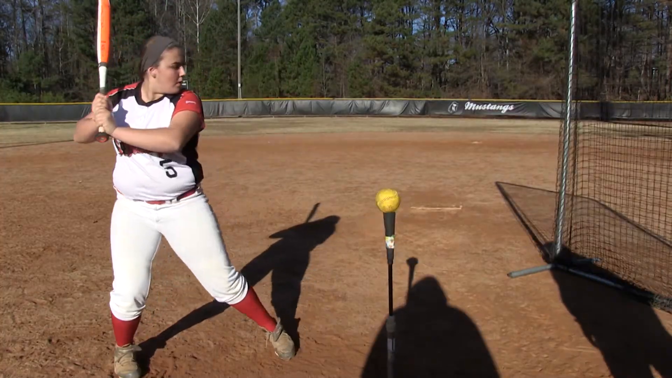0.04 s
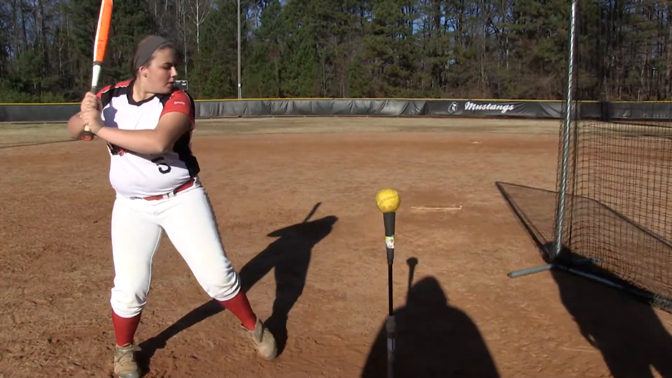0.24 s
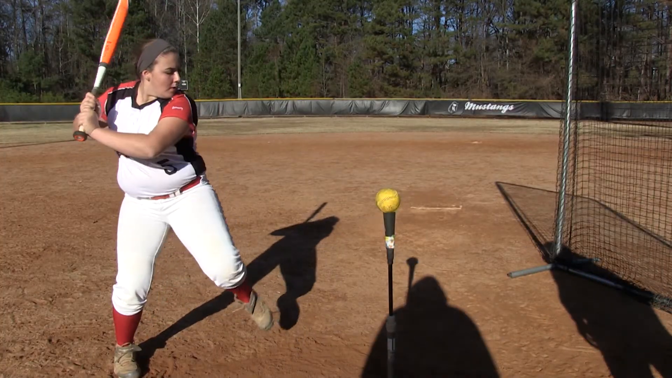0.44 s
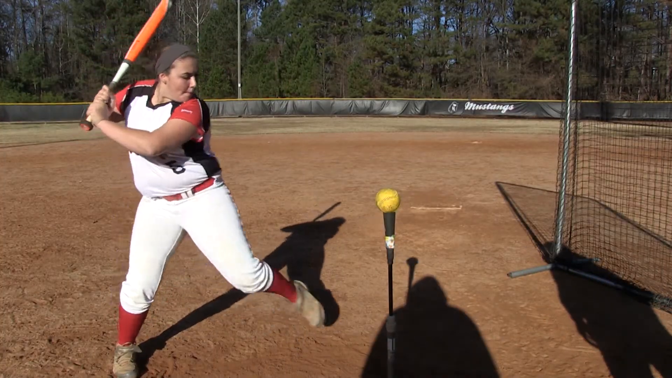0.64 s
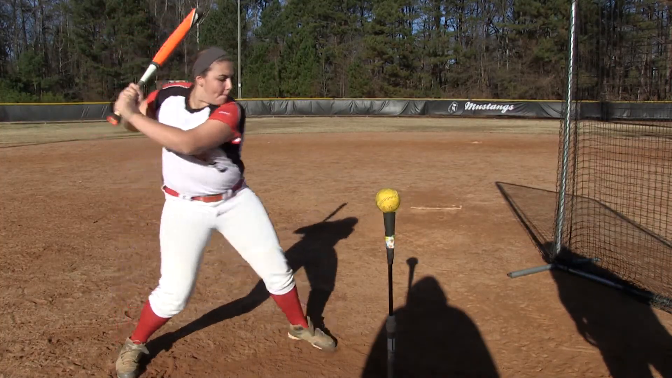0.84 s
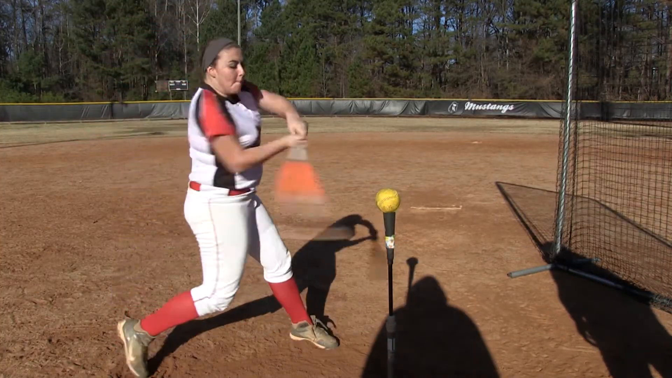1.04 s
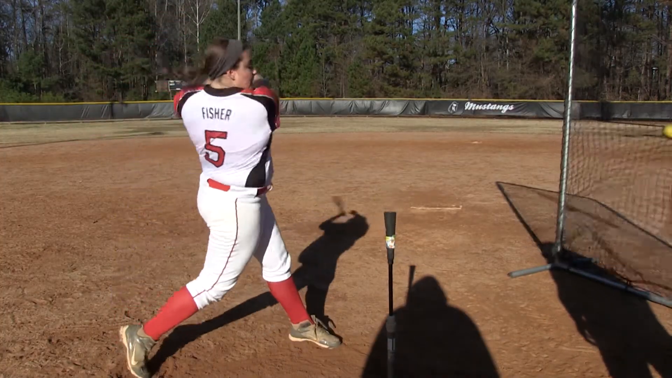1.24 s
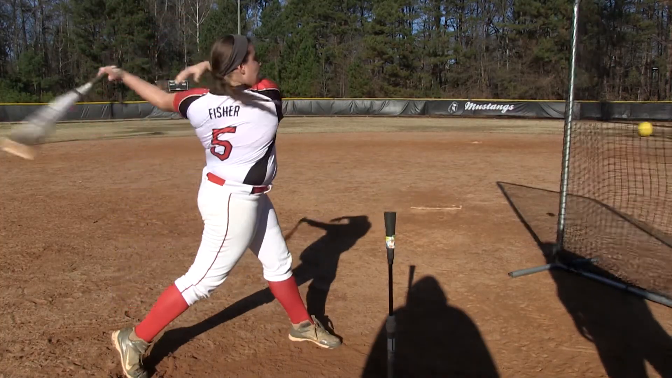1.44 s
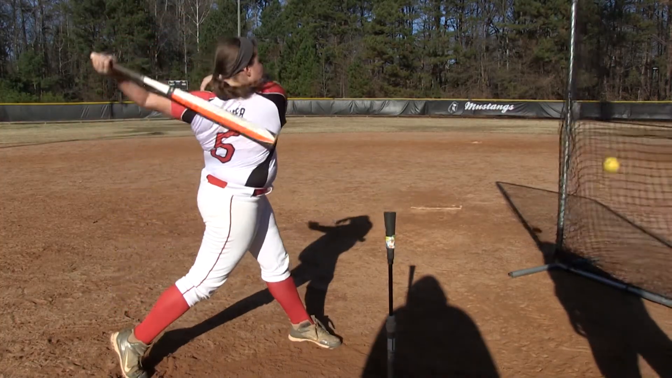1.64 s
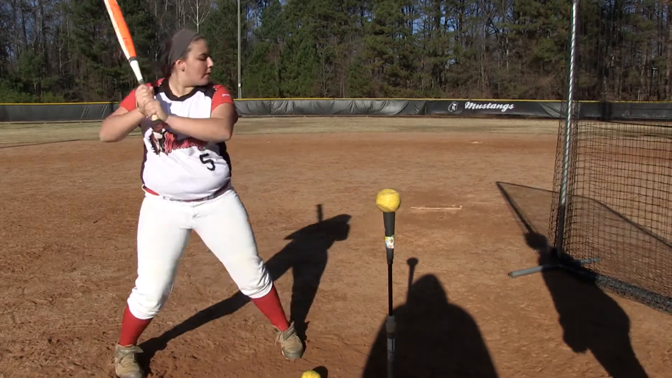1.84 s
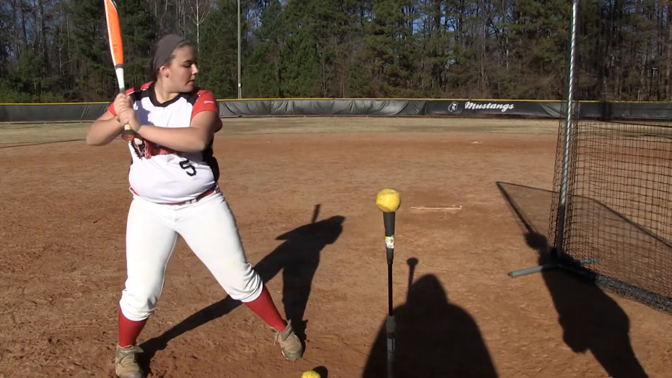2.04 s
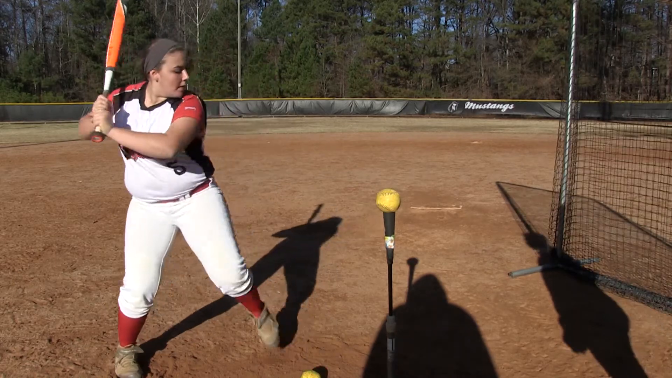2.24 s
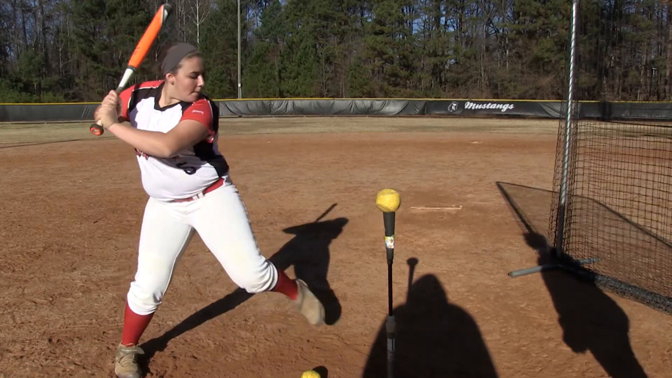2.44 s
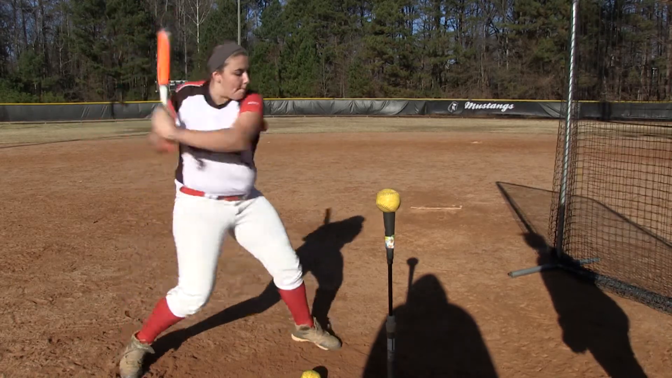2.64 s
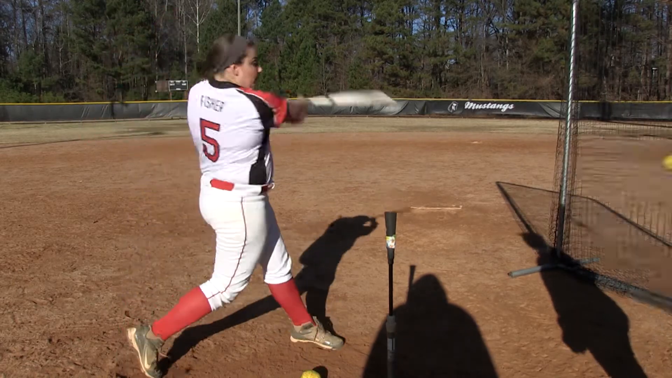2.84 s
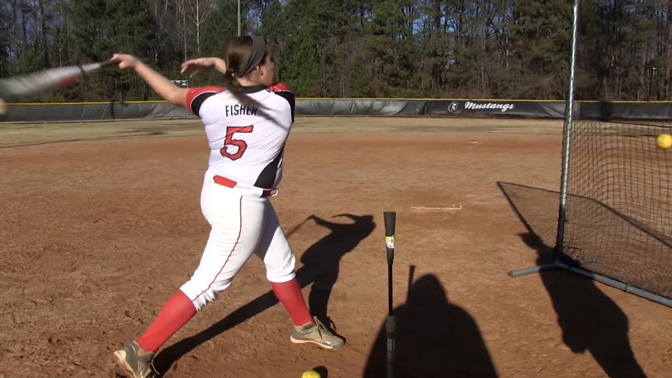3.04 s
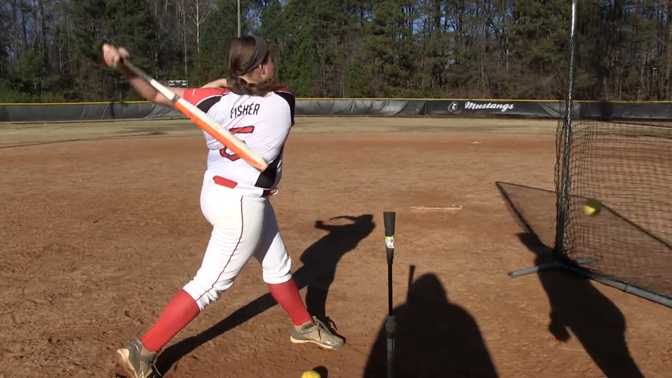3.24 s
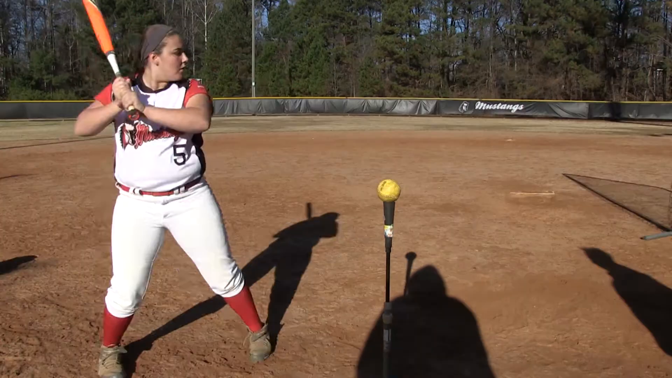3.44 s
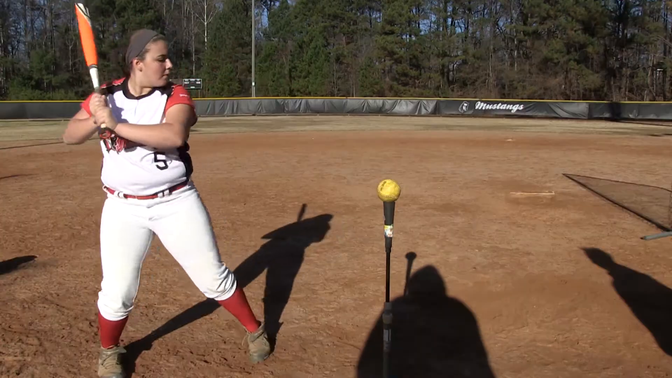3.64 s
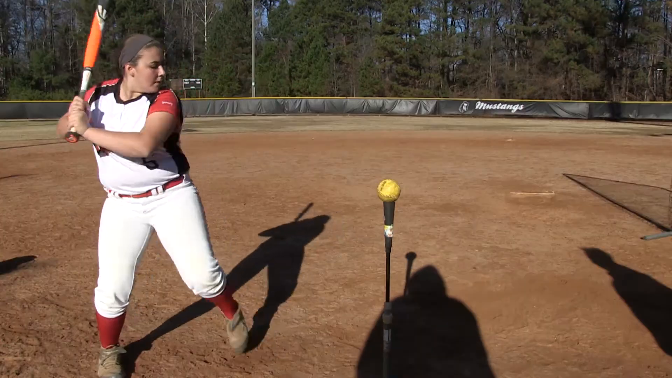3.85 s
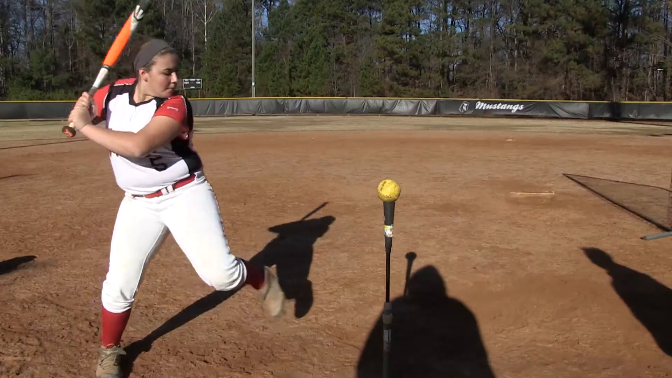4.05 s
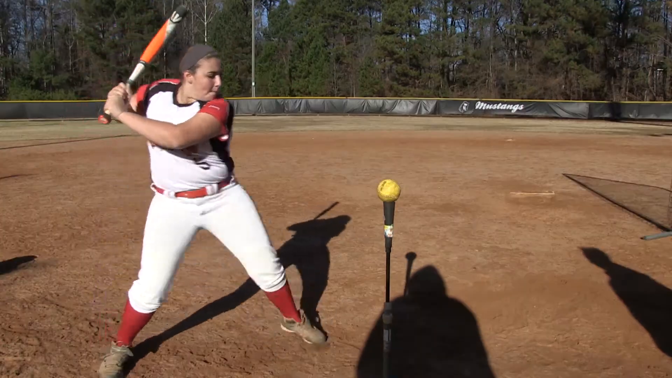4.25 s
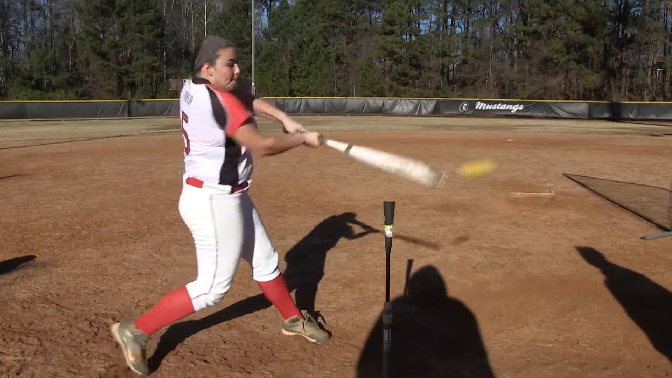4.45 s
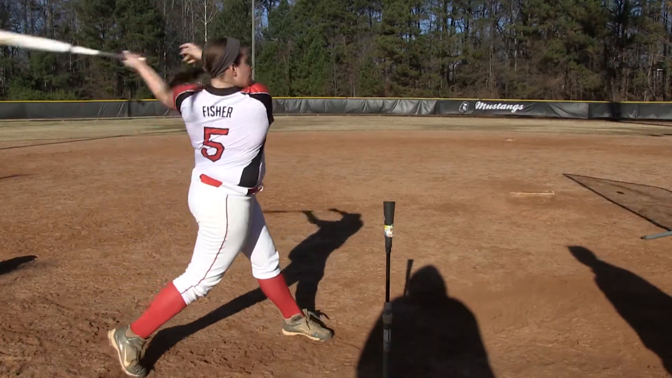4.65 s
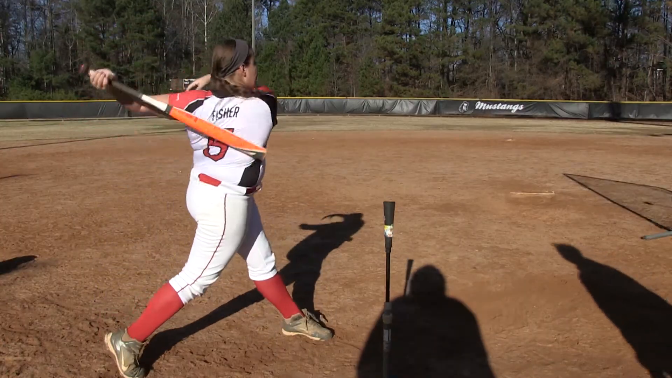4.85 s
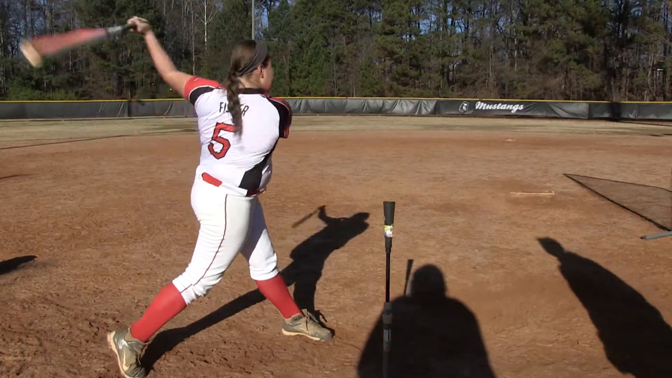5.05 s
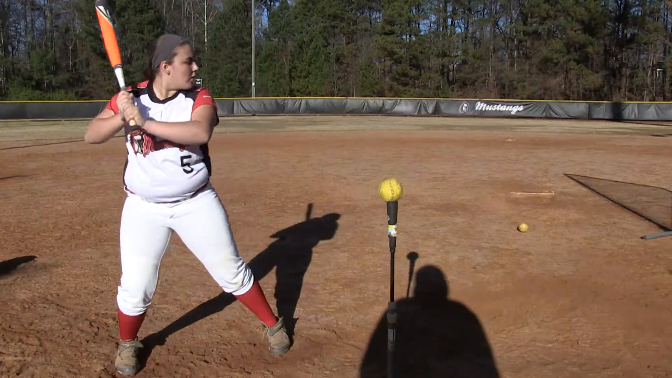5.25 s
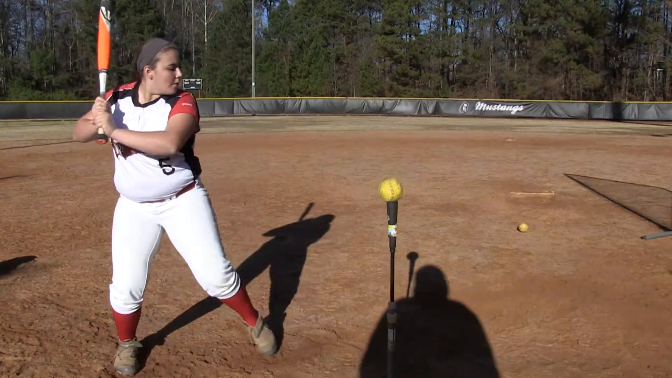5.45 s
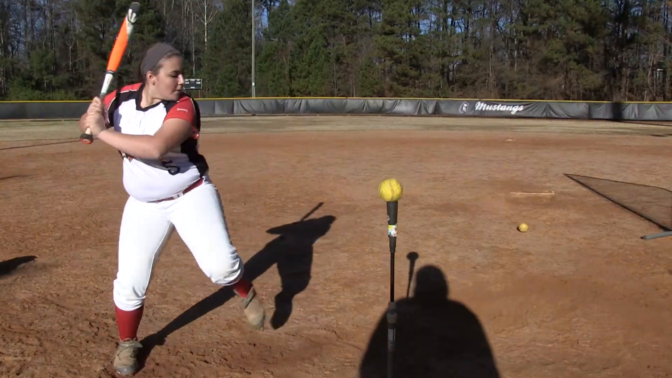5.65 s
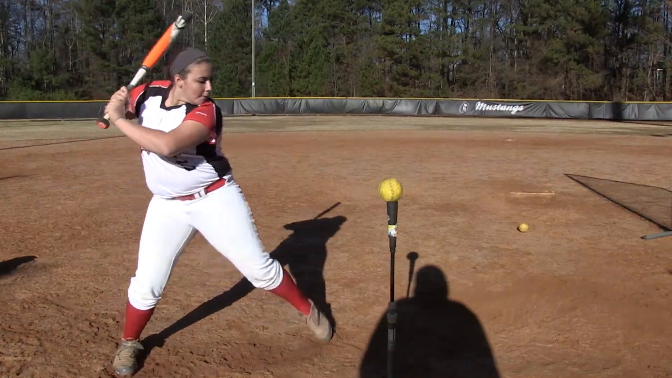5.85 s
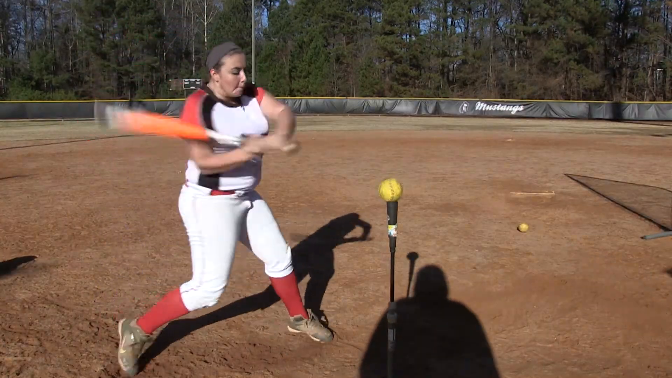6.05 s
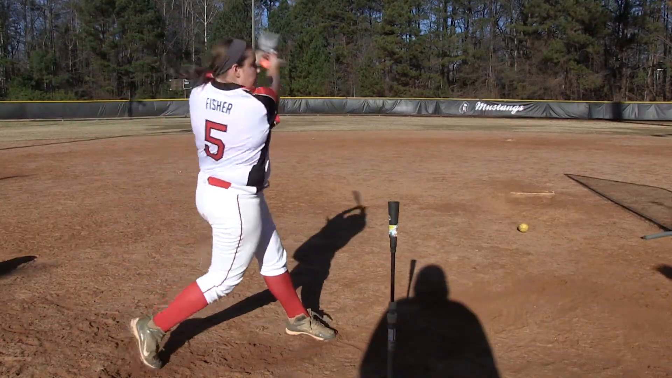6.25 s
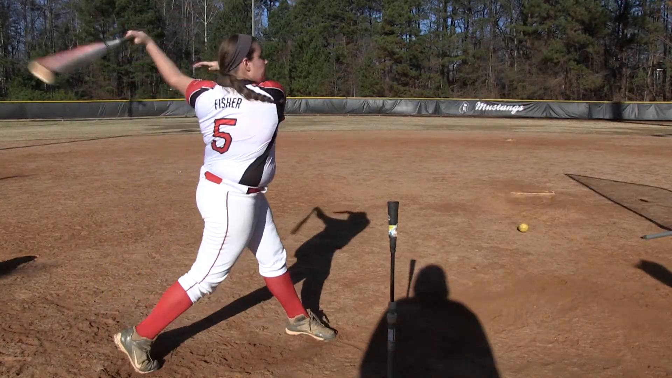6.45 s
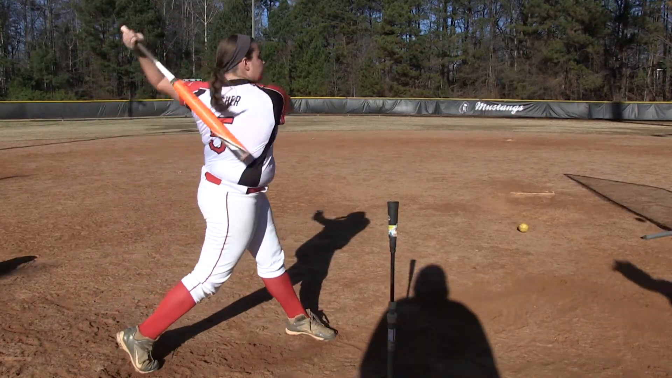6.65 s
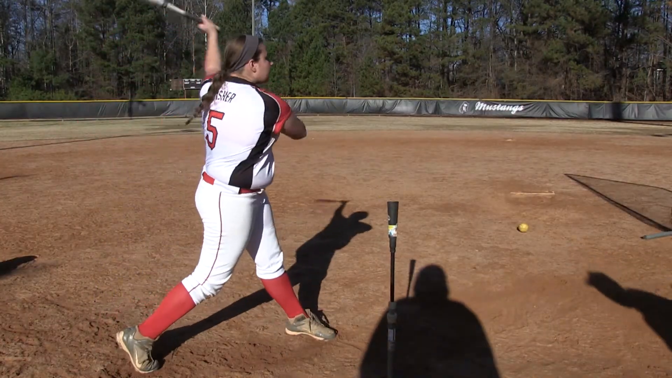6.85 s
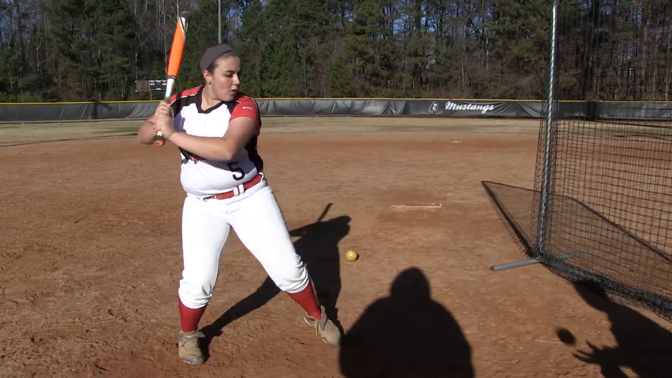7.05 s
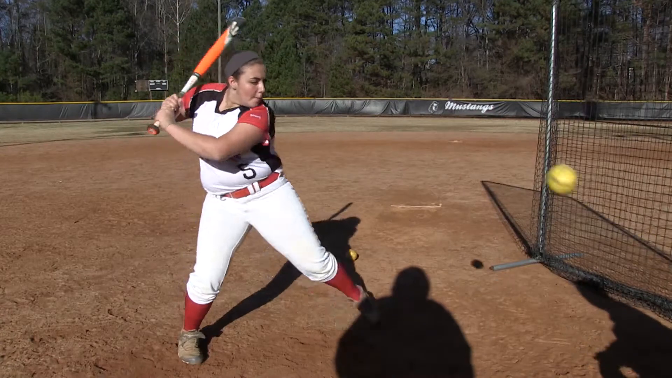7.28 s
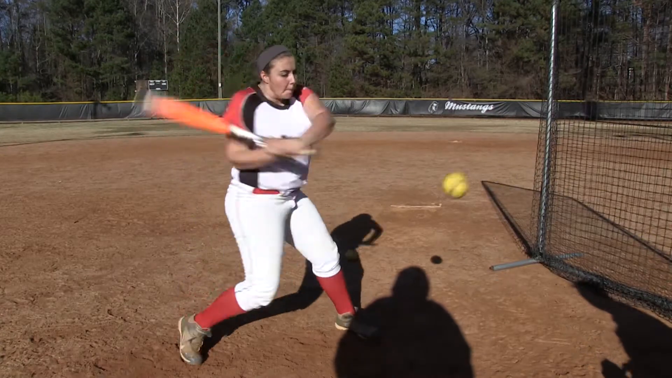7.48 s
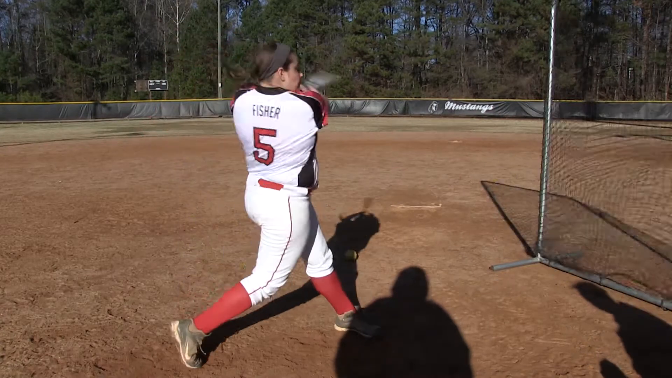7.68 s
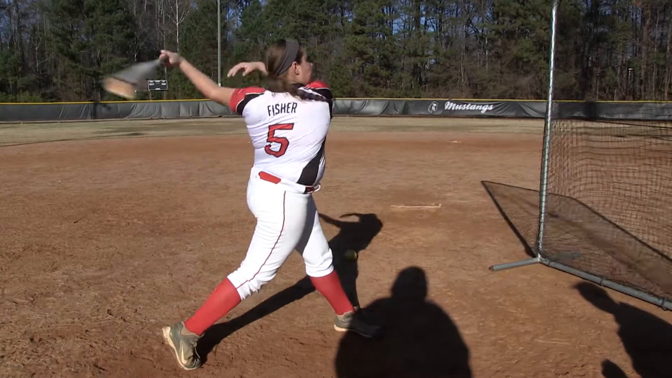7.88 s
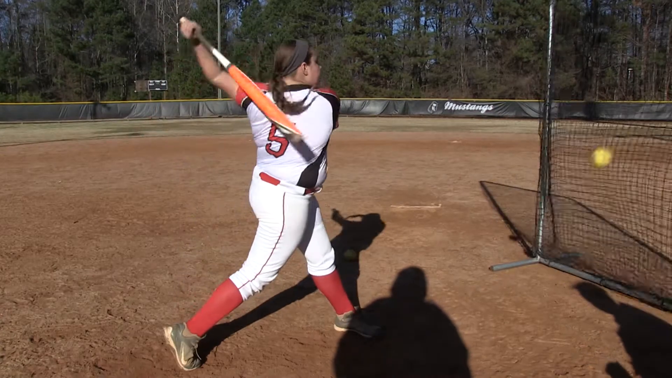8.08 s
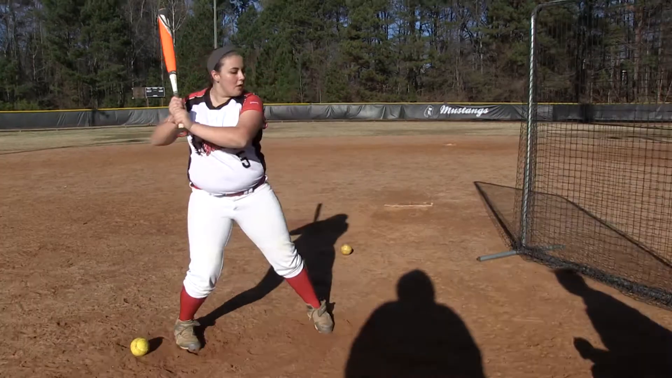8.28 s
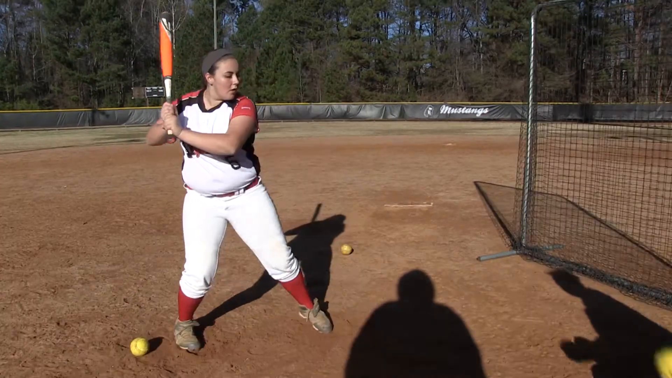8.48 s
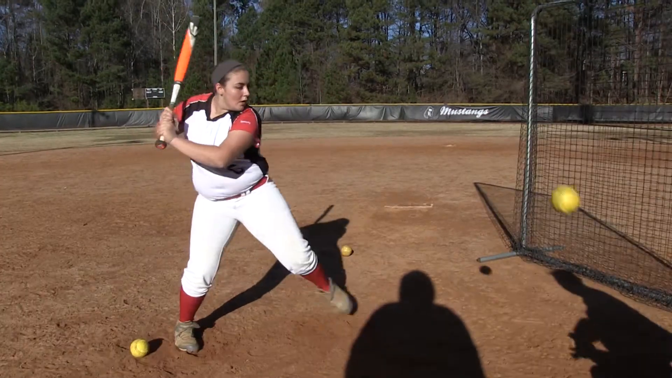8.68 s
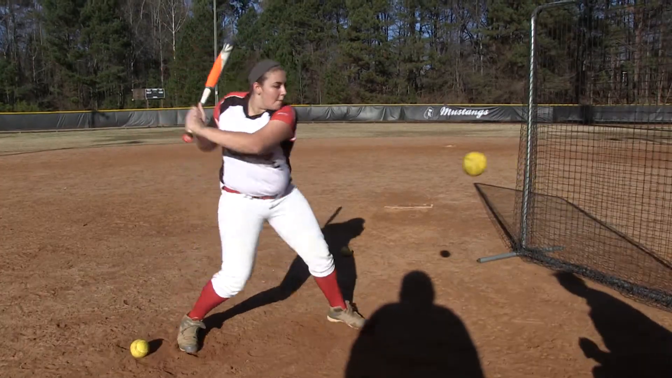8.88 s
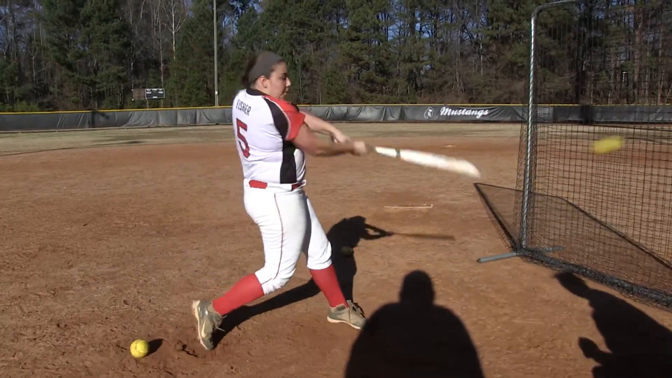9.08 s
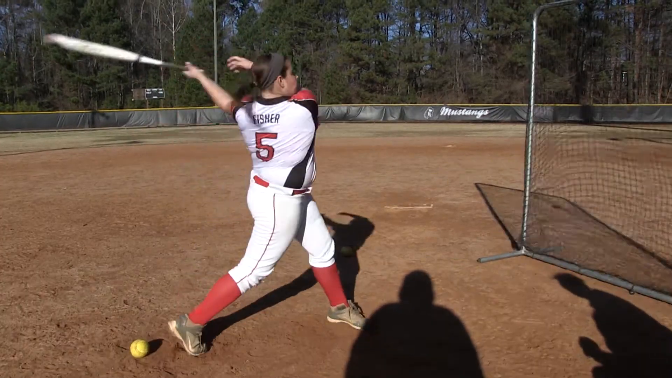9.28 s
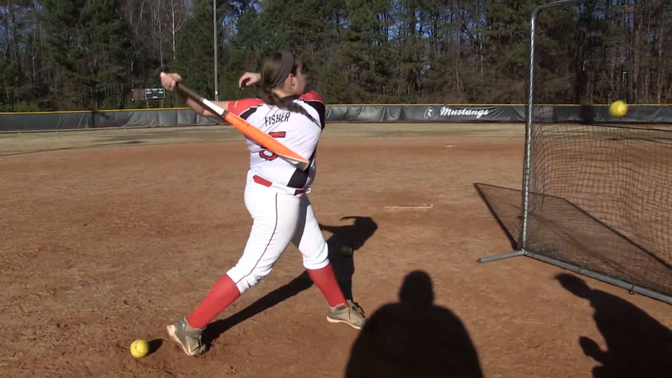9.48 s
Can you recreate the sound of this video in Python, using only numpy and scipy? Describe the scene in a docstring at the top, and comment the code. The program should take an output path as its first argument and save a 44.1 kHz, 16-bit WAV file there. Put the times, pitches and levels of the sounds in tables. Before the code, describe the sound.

Six hard metal bat cracks on an open field, each followed at once by a net snapping taut and its steel frame rattling.

```python
"""Batting practice on an open dirt field

A metal bat hits six softballs: modes and noise that overload the nearby microphone.
The net snaps taut in damped bursts; its steel frame rattles and rings; balls drop on the dirt with noisy thuds.
Cleats scuff before the swings. Filtered noise makes one gust on the microphone, the light breeze
and the distant traffic behind the trees; faint arched whistles sound far off."""
import sys
import numpy as np
from scipy import signal
from scipy.fft import rfft, irfft, next_fast_len
from scipy.io import wavfile
from scipy.ndimage import map_coordinates

SR = 44100
rng = np.random.default_rng(int(sys.argv[2]) if len(sys.argv) > 2 else 0)


def log_audio(samples):
    """Write samples as a 16-bit WAV file to the path given in sys.argv[1]."""
    # one column per channel
    frames = np.atleast_2d(samples).T
    # limit to full scale, then quantise
    limited = np.clip(frames, -1, 1)
    pcm = np.round(limited * 32767).astype(np.int16)
    wavfile.write(sys.argv[1], SR, pcm)


N = 419832
T = np.arange(N) / SR

# Bat on ball. Each row: start in seconds, knock level in dB, knock pitch in Hz, then levels in dB
# of the body, the crack and the barrel's low, middle and high rings.
HITS = [(1.1592, 12.5, 816, 8, -5, -6, -7.5, -31), (2.8401, 10.5, 1078, 3.5, 0.5, -18.5, -16, -20.5),
        (4.5040, 11, 1066, 3, -3.5, -18.5, -14, -25), (6.1799, 15, 1090, 2.5, 3, -17.5, -11.5, -8),
        (7.6230, 11, 1046, -1.5, .5, -18, -9.5, -12.5), (9.1163, 10, 823, -8, -2, -11.5, -27, -2.5)]
# Frame and loose bar shaking. Each row: start and stop in seconds, clatter and jingle levels in dB,
# bar pitch in Hz, bar level in dB.
SHAKES = [(1.282, 1.9, -26.5, -21, 2262, -31), (2.926, 3.46, -27.5, -22.5, 3012, -33),
          (4.655, 5.135, -32, -26, 3005, -36), (6.333, 6.935, -30.5, -23, 3017, -37),
          (7.695, 8.33, -20.5, -16.5, 3030, -36.5), (9.191, 9.52, -22, -19.5, 3008, -30.5)]
# Spectrum of the frame's clatter. Each row: frequency in Hz, level in dB.
CLATTER = [(120, 0), (200, 0.5), (581, 1), (683, -5), (775, 6.5), (946, -1), (1110, 8), (1290, -1),
           (2250, 0.5), (2850, -10.5), (3060, -1), (5660, -22.5), (7970, -36), (8720, -41), (15000, -68)]
# Spectrum of grit under cleats. Each row: frequency in Hz, level in dB.
GRIT = [(300, -6), (1000, 8), (2500, -1), (5000, -7), (9000, -12), (12000, -12.5), (16000, -26)]


def undb(db):
    """Decibels to gain."""
    return 10 ** (np.asarray(db) / 20)


def fade(t, t60):
    """Exponential decay, 60 dB in t60 seconds."""
    return np.exp(-np.log(1000) * t / t60)


def clock(length_s):
    """Sample times of a sound of this length, at least 16 samples."""
    return np.arange(max(int(length_s * SR), 16)) / SR


def add(out, start_s, x):
    """Mix x into out from start_s, cut at the end of the scene."""
    i = max(int(start_s * SR), 0)
    out[:, i:i + x.shape[-1]] += x[..., :max(N - i, 0)]


def colour(x, points):
    """Filter x by (Hz, dB) points, interpolated over log frequency; rms 1 over all channels."""
    hz, db = np.transpose(points)
    size = next_fast_len(x.shape[-1])
    f = np.maximum(np.fft.rfftfreq(size, 1 / SR), 1)
    gain = undb(np.interp(np.log(f), np.log(hz), db))
    y = irfft(rfft(x, size) * gain, size)[..., :x.shape[-1]]
    return y / np.sqrt(np.mean(y ** 2))


def noise(t, points, grain_db=0, wide_hz=4000):
    """Stereo noise of tiny impacts with uneven sizes; the channels part above wide_hz."""
    own = np.random.default_rng(rng.integers(2 ** 31))
    x = own.standard_normal((len(t), 2)).T
    # one size per 24 samples
    sizes = np.minimum(own.exponential(size=len(t) // 24 + 1), 5)
    sizes = np.repeat(sizes, 24)[:len(t)]
    mid, side = x * undb(grain_db * sizes)
    side = signal.lfilter(*signal.butter(1, min(wide_hz, SR / 3), "high", fs=SR), side)
    return colour(np.array([mid + side, mid - side]), points)


def walk(t, rate_hz):
    """Smooth random wander, spread near 1."""
    steps = rng.standard_normal(512)
    return map_coordinates(steps, [t * rate_hz], order=2, mode="wrap")


def ring(t, hz, t60):
    """One struck mode, starting from rest position."""
    return np.sin(2 * np.pi * hz * t) * fade(t, t60)


def kick(t, hz, t60):
    """One mode that starts at full swing."""
    return np.cos(2 * np.pi * hz * t) * fade(t, t60)


def shaken(t, hz, t60, chatter_t60):
    """A mode struck repeatedly by a dying chatter, swelling then fading; each channel hears another mix."""
    blows = noise(t, [(20, 0.022), (16000, 0)], wide_hz=1500) * fade(t, chatter_t60)
    pole = fade(1 / SR, t60) * np.exp(2j * np.pi * min(hz, .45 * SR) / SR)
    y = signal.lfilter([1], [1, -pole], blows).imag
    # same energy in each channel as the plain decay
    return y * np.sqrt(np.sum(fade(t, t60) ** 2) / np.sum(y ** 2, axis=1, keepdims=True))


def partials(t, hz, points):
    """Many weak steady modes with chance strengths, parting more between channels as they rise; rms 1."""
    lines = np.zeros((2, SR // 2 + 1), complex)
    phases = np.exp(2j * np.pi * rng.random((3, len(hz))))
    shared, left, right = rng.standard_normal((3, len(hz))) * phases
    lines[:, hz.astype(int)] = shared + hz / 4000 * np.array([left, right])
    return colour(irfft(lines)[:, :len(t)], points)


def taps(t, rate_hz, tap_hz, spread_octaves=1.6, t60=0.11, spread_db=18):
    """Up to 400 random light taps, each ringing its own short resonance; rms 1."""
    out, u = np.zeros(len(t) + SR), clock(.1)
    for when, pitch, size in rng.random((400, 3))[:int(rate_hz * t[-1])]:
        i = int(when * len(t))
        hz = tap_hz * 2 ** (spread_octaves * (2 * pitch - 1))
        out[i:i + len(u)] += undb(-spread_db * size) * ring(u, hz, t60)
    out = out[:len(t)]
    return out / np.sqrt(np.mean(out ** 2) + 1e-18)


def blow(t, points, t60):
    """A short noisy impact with a sharp onset; its energy is set by t60, whatever its grain."""
    burst = noise(t, points, wide_hz=4870) * (fade(t, t60) + fade(t, 0.0025)) * np.minimum(t / 0.00023, 1)
    return burst * np.sqrt(np.sum(fade(t, t60) ** 2) / np.sum(burst ** 2) * 2)


def snap(hz, t60, ring_db=-4):
    """A short burst peaking at hz, with one damped resonance."""
    t = clock(.12)
    peak = [(hz / 8, -22), (hz / 3.9, -7), (hz, 0), (hz * 1.7, -7), (hz * 4, -24), (hz * 12, -42)]
    return blow(t, peak, t60) + undb(ring_db) * ring(t, hz, t60 * 0.59)


def scuff(length_s, uneven_db=2.5):
    """Cleats press on grit unevenly and let go."""
    t = clock(length_s)
    pressure = np.minimum(t / .002, 1) * np.sqrt(1 - t / t[-1]) * undb(uneven_db * walk(t, 45))
    return noise(t, GRIT, grain_db=3.5, wide_hz=2500) * pressure


def field():
    """Distant traffic and trees as wandering noise, with a light breeze rumbling on the ports."""
    # Spectrum of traffic and trees. Each row: frequency in Hz, level in dB.
    far_spectrum = [(20, -20.5), (50, -8.5), (100, 1.5), (200, -7), (380, -10.5), (480, -9.5), (620, -9),
                    (1200, -22.5), (2900, -34.5), (6000, -42), (10000, -48.5), (13000, -59), (16000, -67)]
    # Traffic level. Each row: time in seconds, level in dB.
    traffic = [(0, -51), (1.8, -49), (9.5, -48)]
    # Breeze level. Each row: time in seconds, level in dB.
    breeze_level = [(0, -57.5), (2.4, -64.5), (5.9, -64), (7.1, -53), (8.7, -64.5)]
    traffic_db = np.interp(T, *np.transpose(traffic)) + 0.6 * walk(T, 19.0)
    far = noise(T, far_spectrum, wide_hz=2200) * undb(traffic_db)
    rumble = [(20, -22.5), (70, 0.5), (150, -13.0), (400, -20.5), (2000, -62.0), (8000, -92.5)]
    breeze = colour(rng.standard_normal((2, N)), rumble)
    puffs_db = 1.5 * walk(T, 4)
    return far + breeze * undb(np.interp(T, *np.transpose(breeze_level)) + puffs_db)


def birds():
    """Faint far whistles, likely birds: sines whose level and pitch arch together."""
    # Each row: start in seconds, pitch in Hz, length in seconds, arch as a share of pitch, level in dB.
    whistles = [(2.17, 7800, .07, 0.0088, -72), (2.35, 7700, .09, .025, -79),
                (3.843, 1500, 0.099, 0.15, -62), (4.058, 3600, 0.25, 0.011, -62)]
    out = np.zeros((2, N))
    for start_s, hz, length_s, arch, db in whistles:
        t = clock(length_s)
        swell = np.sin(np.pi * t / length_s)
        pitch_hz = hz * (1 + arch * swell + 0.004 * walk(t, 60))
        add(out, start_s, undb(db) * swell * np.sin(2 * np.pi * np.cumsum(pitch_hz) / SR))
    return out


def wind(flutter_db=-3.5, eddy_half_width_s=0.016):
    """One gust: eddies hit each microphone port on their own; the biggest swell and pass on the right."""
    # Each row: time in seconds, level in dB, left minus right in dB.
    gust = [(3.46, -26, -4), (3.629, -35.5, -5.5), (3.85, -27.5, -6), (4.17, -30, -9.5), (4.31, -26, 3),
            (4.38, -36.5, -5), (5.131, -42, 3)]
    # Spectrum of the buffeting. Each row: frequency in Hz, level in dB.
    buffet = [(12, -45), (20, -20.5), (75, 2), (117, 0), (189, -3.5), (240, -8.5), (274, -9), (338, -15),
              (700, -36.5), (910, -63), (1540, -120)]
    # Big eddies on the right port. Each row: peak time in seconds, extra level in dB.
    big_eddies = [(3.521, 7.5), (3.76, 12), (4.046, 10)]
    s, db, pan_db = np.transpose(gust)
    flutter = undb(flutter_db * np.array([walk(T, 42), walk(T, 21)]))
    eddies = colour(rng.standard_normal((2, N)), buffet) * flutter
    swell_db = sum(extra_db * np.exp(-((T - at) / eddy_half_width_s) ** 2) for at, extra_db in big_eddies)
    ports_db = np.interp(T, s, pan_db) * np.array([[.5], [-.5]]) + swell_db * np.array([[0], [1]])
    blowing = np.clip(np.minimum(T - s[0], s[-1] - T) / 0.0037, 0, 1)
    return eddies * blowing * undb(np.interp(T, s, db) + ports_db)


def dirt(pivot_db=-56, shuffle_s=.09, grind_s=.13):
    """Balls thud on packed dirt; feet shuffle, the front foot lands, back cleats grind as the hips turn."""
    # Ball landings. Each row: start in seconds, level in dB.
    drops = [(1.7012, -20), (3.2764, -15.5), (4.9135, -20.5), (6.6922, -31), (8.0826, -22)]
    # Spectrum of a landing. Each row: frequency in Hz, level in dB.
    thud_spectrum = [(60, -3.5), (250, 1.5), (700, 6), (1400, 4.5), (2600, -1), (4500, -16.5),
                     (8000, -21.5), (16000, -36.5)]
    # Feet shifting in the stance. Each row: start in seconds, grit level in dB.
    shuffles = [(.275, -60), (2.091, -62), (2.215, -57.5), (3.71, -60), (3.81, -58), (5.487, -54),
                (6.745, -51.5), (7.11, -57), (8.6, -55)]
    # Front foot landing and grinding in. Each row: start in seconds, footfall and grit levels in dB.
    strides = [(.841, -35.5, -48.5), (2.605, -34, -49.5), (4.26, -51, -47.5), (5.935, -34, -46.5),
               (7.401, -35, -43.5), (8.879, -43, -52)]
    out, t = np.zeros((2, N)), clock(.2)
    for start_s, db in drops:
        thud = blow(t, thud_spectrum, 0.03) + undb(-38.5) * blow(t, thud_spectrum, 0.75)
        add(out, start_s, undb(db) * (thud + undb(-8.0) * ring(t, 101, 0.085)))
    for start_s, db in shuffles:
        add(out, start_s, undb(db) * scuff(shuffle_s))
    footfall = [(40, -17), (140, 11.5), (500, -2), (2000, -12), (9000, -26.5), (16000, -29)]
    for start_s, foot_db, grit_db in strides:
        add(out, start_s, undb(foot_db) * blow(t, footfall, 0.068))
        add(out, start_s, undb(grit_db) * scuff(grind_s))
    # the pivot ends at the hit
    u = clock(.18)
    for hit_s, *_ in HITS:
        pivot = noise(u, GRIT, grain_db=1.5, wide_hz=2500) * np.minimum(u / 0.005, 1)
        add(out, hit_s - u[-1], undb(pivot_db) * pivot)
    return out


def loose_bar(beat_hz=11.6, twin_db=-5, buzz_db=4, rise_s=.018):
    """A loose steel part as a free bar: damped buzzing chatter over a ring whose modes beat with twins."""
    # One row per mode: ring level in dB, ring t60 in seconds, chatter level in dB, chatter t60 in seconds.
    bar_modes = [(-1.5, 1.4, 4, .55), (-12, 1.0, 4, 0.45), (-22, .6, -6, .3)]
    # Mode pitches as ratios to the lowest.
    mode_ratios = (1, 2.815, 5.41)
    out = np.zeros((2, N))
    for start_s, stop_s, _, _, bar_hz, db in SHAKES:
        t = clock(stop_s - start_s)
        gate = np.clip(np.minimum(t / rise_s, (t[-1] - t) / 0.0058), 0, 1)
        for ratio, (mode_db, t60, chatter_db, chatter_t60) in zip(mode_ratios, bar_modes):
            hz = bar_hz * ratio
            # the ring reaches the two ports a quarter cycle apart
            u = t + np.array([[.25], [0]]) / hz
            free = ring(u, hz, t60) + undb(twin_db) * ring(u, hz + beat_hz, t60)
            buzz = undb(buzz_db + chatter_db) * shaken(t, hz, 0.064, chatter_t60)
            add(out, start_s, undb(db) * (undb(mode_db) * free + buzz) * gate)
    return out


def frame(wash_db=-5, taps_db=-6, partials_db=-4, tinkle_db=-5, count=170, rise_s=0.02, shake_t60=0.93):
    """The shaken frame clatters, small steel parts jingle, and its tubes ring among many weak modes."""
    # Spectrum of small steel parts. Each row: frequency in Hz, level in dB.
    jingle_spectrum = [(1500, -22), (3200, 6.5), (4300, -0.5), (7200, -7), (9000, 1.5), (12000, -6),
                       (16000, -18)]
    # Frame tubes. Each row: pitch in Hz, level in dB, chatter t60 in seconds (the mode's own is half).
    tube_modes = [(1038, -17, 1.1), (1160, -43, 3.6), (1850, -20, 1.84), (1760, -39, 0.33),
                  (2260, -36.5, 1.13), (2530, -32, 1.4)]
    tap_spectrum = [(400, -7), (1000, 5.5), (2400, 13.0), (5000, -31.5)]
    out = np.zeros((2, N))
    weak_hz = 500 + 11000 * rng.random(count) ** 2
    for start_s, stop_s, db, jingle_db, *_ in SHAKES:
        t = clock(stop_s - start_s)
        wash = undb(wash_db) * noise(t, CLATTER, grain_db=4.5, wide_hz=2460)
        modes = undb(partials_db) * partials(t, weak_hz, CLATTER)
        clatter = wash + modes + undb(taps_db) * colour(taps(t, 450, 1507), tap_spectrum)
        tubes = sum(undb(mode_db) * shaken(t, hz, t60 / 2, t60) for hz, mode_db, t60 in tube_modes)
        chatter = noise(t, jingle_spectrum, grain_db=1.3, wide_hz=1100)
        steel = undb(0.5) * chatter + undb(tinkle_db) * partials(t, weak_hz, jingle_spectrum)
        jingle = steel * (fade(t, 0.17) + undb(-29.5) * fade(t, 1.0))
        sound = undb(db) * (clatter * fade(t, shake_t60) + tubes) + undb(jingle_db) * jingle
        add(out, start_s, sound * np.clip(np.minimum(t / rise_s, (t[-1] - t) / 0.0036), 0, 1))
    return out


def net():
    """The cords catch the ball and tug taut, the frame clanks, then rocks back with a knock and clatter."""
    # Ball into net. Each row: start in seconds, level in dB.
    catches = [(1.244, -19), (2.9049, -16.5), (4.5620, -18.5), (6.2378, -13.5), (7.686, -23), (9.182, -17)]
    # Taut net jolting the frame. Each row: start in seconds, level in dB, centre in Hz.
    clanks = [(1.2686, -10, 2960), (2.918, -15, 3610), (4.6508, -17, 3710), (4.76, -24.5, 447),
              (6.3230, -18.5, 3780), (7.6900, -14, 2810), (9.1876, -16, 3430)]
    # Frame rocking back. Each row: start in seconds, level in dB.
    rocks = [(3.079, -28), (4.72, -30), (6.434, -35), (6.822, -42), (7.856, -25), (8.246, -33.5),
             (9.244, -26.5), (9.413, -29)]
    catch_hz, catch_t60 = 960, 0.056
    # two tugs, each weaker and higher; both last longer than the catch
    tug_gap_s, tug_step_db, tug_pitch_ratio, tug_t60 = 0.016, -7, 1.4, 0.13
    rock_hz, rock_t60, rock_clatter_db, rock_clatter_t60 = 1810, 0.077, -4, 0.28
    out, t = np.zeros((2, N)), clock(.2)
    for start_s, db in catches:
        add(out, start_s, undb(db) * snap(catch_hz, catch_t60))
        for k in (1, 2):
            tug = snap(catch_hz * tug_pitch_ratio ** k, tug_t60)
            add(out, start_s + k * tug_gap_s, undb(db + k * tug_step_db) * tug)
    for start_s, db, hz in clanks:
        add(out, start_s, undb(db) * snap(hz, 0.025))
    for start_s, db in rocks:
        add(out, start_s, undb(db) * snap(rock_hz, rock_t60))
        clatter = noise(t, CLATTER, grain_db=3.0, wide_hz=2470) * fade(t, rock_clatter_t60)
        add(out, start_s, undb(db + rock_clatter_db) * clatter)
    return out


def bat(ground_s=.0052, ground_db=-13, echo_s=0.017, echo_db=-31, swish_db=-34, knock_t60=0.023, hash_db=-3):
    """Swing swishes; collision cracks, knocks, rings the barrel; ground and things nearby throw it back."""
    # Softer body under the knock. Each row: ratio to the knock pitch, level in dB, t60 in seconds.
    body_modes = [(0.654, -3, 0.049), (.75, -2, 0.051)]
    # The barrel's low, middle and high rings. Each row: pitch in Hz, t60 in seconds.
    barrel_modes = [(1058, 0.115), (1382, 0.095), (1800, 0.1)]
    # Short high modes of the shell. Each row: pitch in Hz, level in dB, t60 in seconds.
    shell_modes = [(2134, -12.5, 0.027), (2510, -16, .045), (2760, -7, 0.041), (3346, -14.5, 0.057),
                   (3570, -9, 0.021), (4524, -16, 0.029), (6060, -15.5, 0.023)]
    # Spectrum of the contact. Each row: frequency in Hz, level in dB.
    crack_spectrum = [(300, -15), (1200, 3), (2800, 4), (5500, -3), (9000, -12.5), (16000, -28.5)]
    # Spectrum of the scatter. Each row: frequency in Hz, level in dB.
    scatter_spectrum = [(150, -29.5), (500, -5.5), (1100, 3.5), (2000, -5), (3500, -16), (7000, -25),
                        (16000, -45)]
    # Spectrum of the swing. Each row: frequency in Hz, level in dB.
    swish_spectrum = [(40, -22), (100, -6), (220, -0.5), (500, -6), (1200, -19), (4000, -29.5),
                      (16000, -51)]
    thump_ratio, thump_t60 = .405, 0.031
    # thump relative to body, scatter relative to crack
    thump_db, scatter_db = -5, -7
    out, t = np.zeros((2, N)), clock(0.33)
    for hit_s, knock_db, knock_hz, body_db, crack_db, *barrel_db in HITS:
        body = sum(undb(db) * kick(t, knock_hz * ratio, t60) for ratio, db, t60 in body_modes)
        thump = undb(thump_db) * kick(t, knock_hz * thump_ratio, thump_t60)
        knock = undb(knock_db) * kick(t, knock_hz, knock_t60) + undb(body_db) * (body + thump)
        barrel = sum(undb(db) * kick(t, hz, t60) for db, (hz, t60) in zip(barrel_db, barrel_modes))
        # each point of contact wakes the shell modes in other shares
        shell = sum(undb(db + 2 * rng.standard_normal((2, 1))) * ring(t, hz, t60)
                    for hz, db, t60 in shell_modes)
        # a sharp spike that dies into a hash of dense modes
        spike = noise(t, crack_spectrum, wide_hz=3600) * (fade(t, 0.028) + 5 * fade(t, 0.0052))
        crack = undb(crack_db) * (shell + undb(hash_db) * spike)
        scatter_fade = fade(t, 0.071) + undb(-21.5) * fade(t, 0.19)
        scatter = undb(crack_db + scatter_db) * noise(t, scatter_spectrum, wide_hz=5000) * scatter_fade
        add(out, hit_s, knock + barrel + crack + scatter)
        add(out, hit_s + ground_s, undb(ground_db) * crack)
        add(out, hit_s + echo_s, undb(echo_db) * (knock + crack))
        # the swish grows up to the hit
        swish = noise(t, swish_spectrum, wide_hz=2500) * fade(t, 0.3)[::-1]
        add(out, hit_s - t[-1], undb(swish_db) * swish)
    return out


def scene():
    """Everything on the field."""
    return field() + birds() + wind() + dirt() + loose_bar() + frame() + net() + bat()


def record(dry, knee=5, ceiling=1.0, top_hz=15900):
    """The input stage flattens the hits, its coupling tilts the flat tops, and the top is cut."""
    clipped = dry / (1 + np.abs(dry / ceiling) ** knee) ** (1 / knee)
    coupled = signal.lfilter(*signal.butter(1, 18, "high", fs=SR), clipped)
    return signal.sosfilt(signal.ellip(8, .2, 70, top_hz, fs=SR, output="sos"), coupled)


dry = scene()
out = record(dry)
log_audio(out)
```